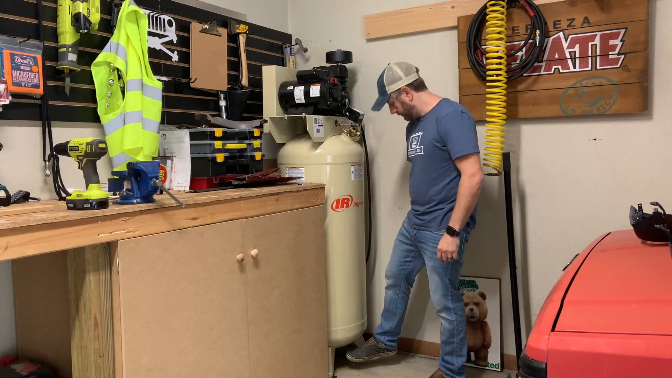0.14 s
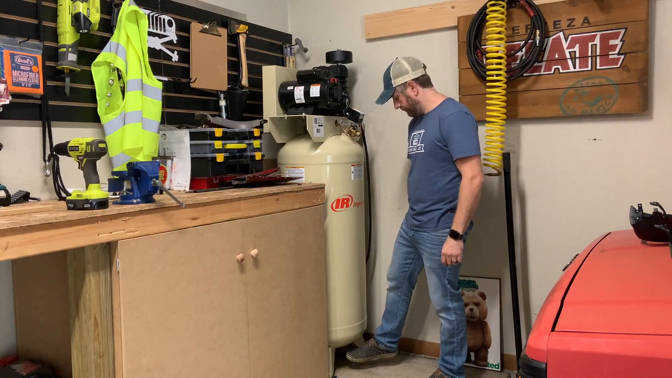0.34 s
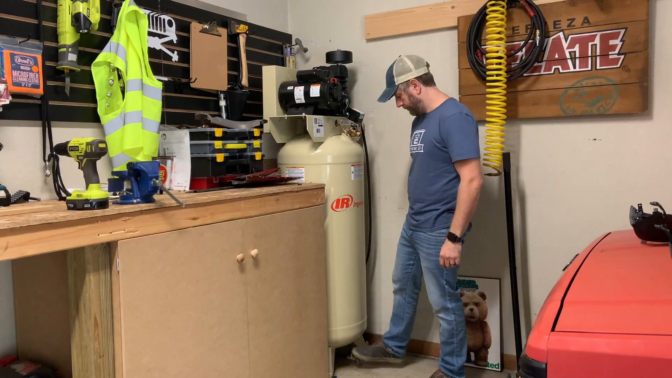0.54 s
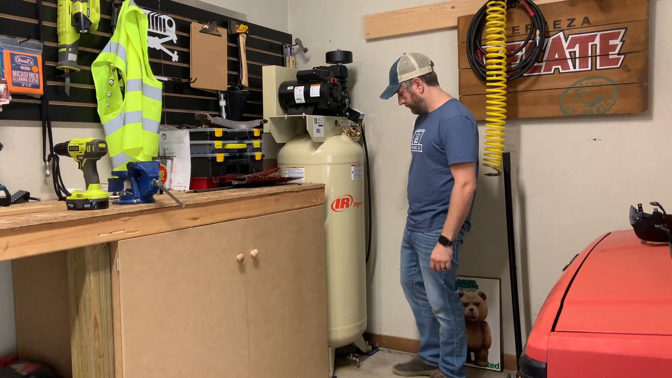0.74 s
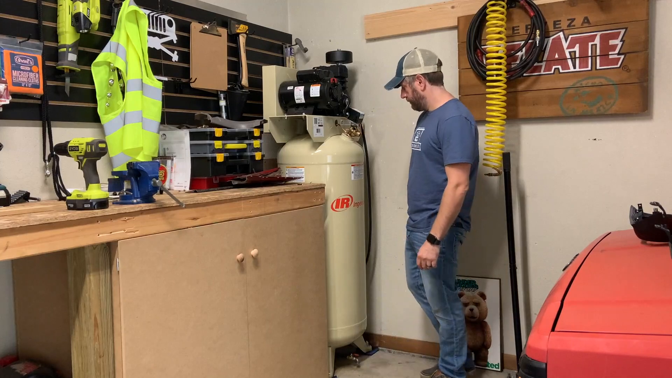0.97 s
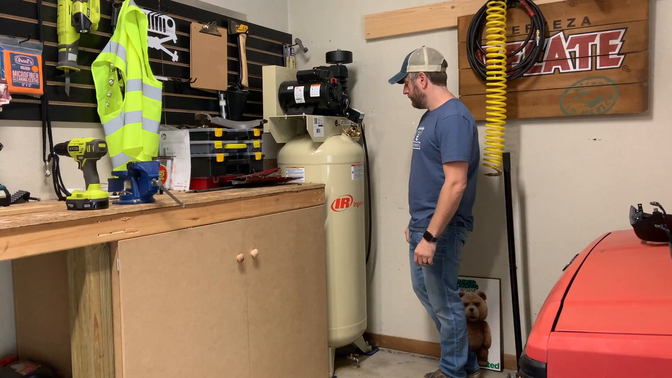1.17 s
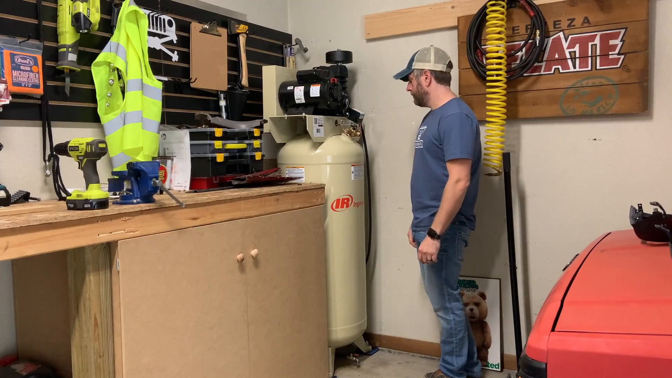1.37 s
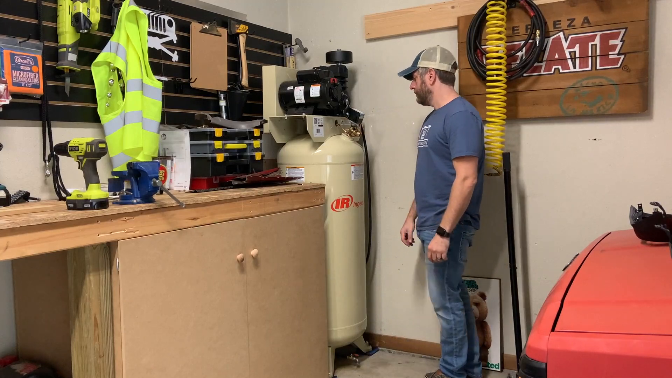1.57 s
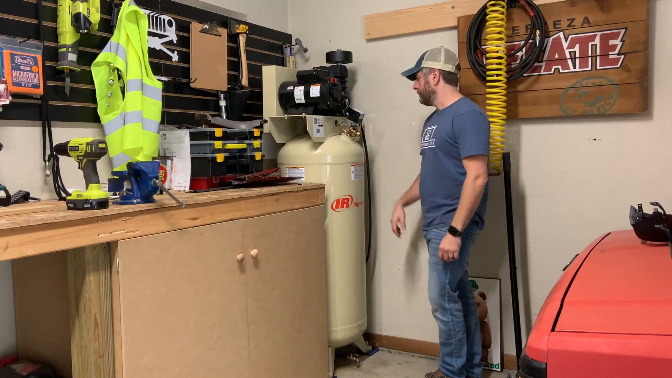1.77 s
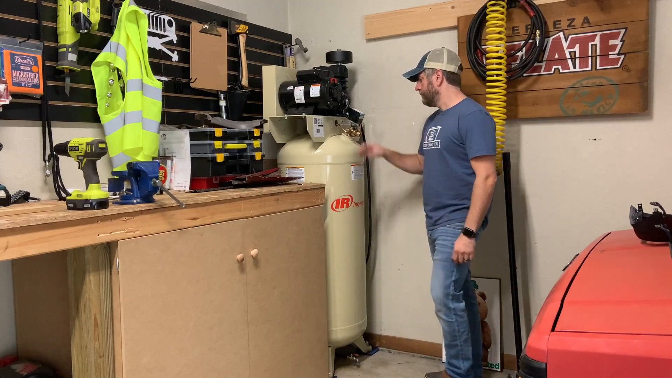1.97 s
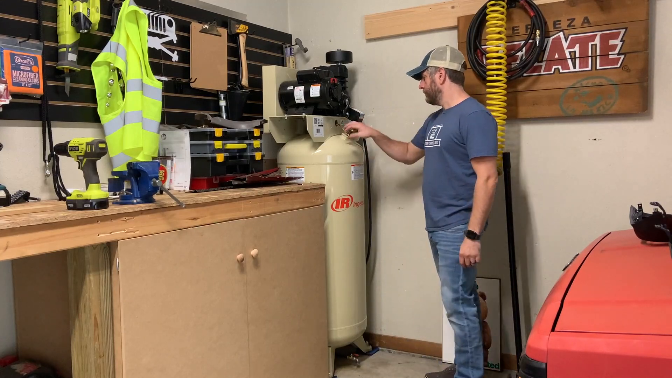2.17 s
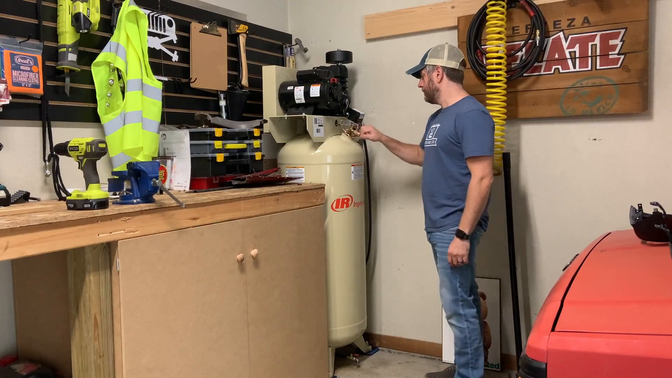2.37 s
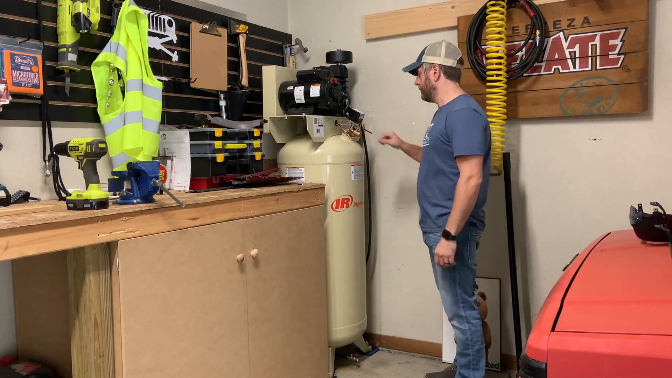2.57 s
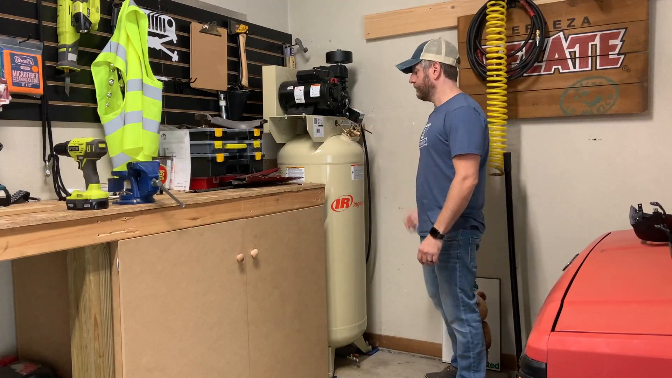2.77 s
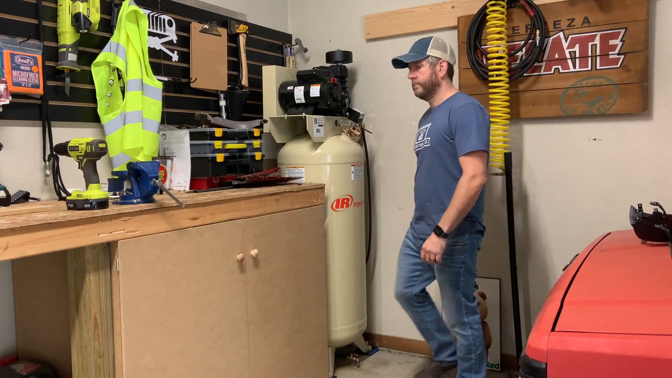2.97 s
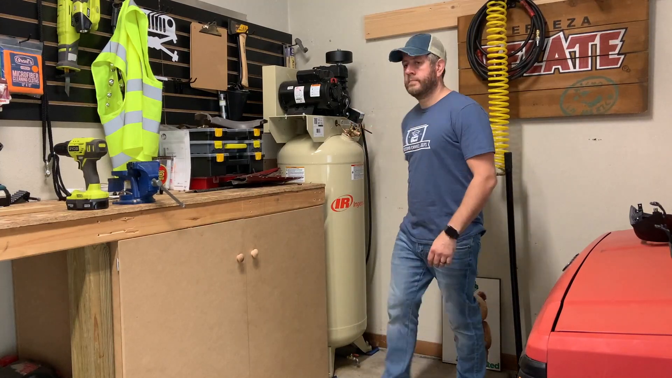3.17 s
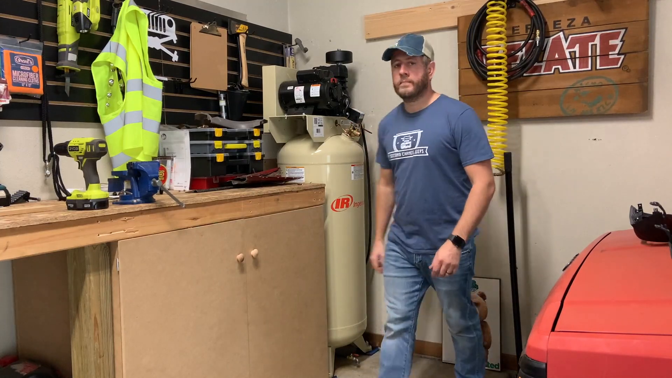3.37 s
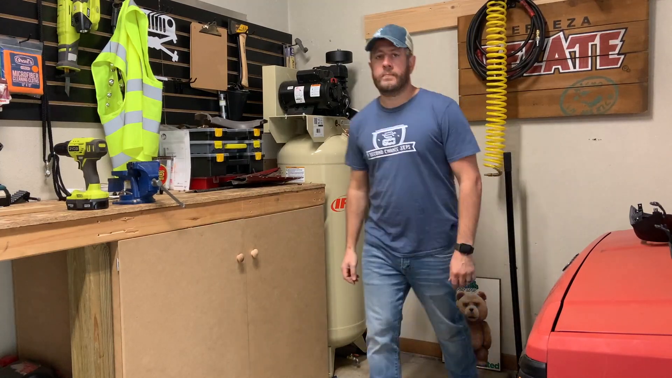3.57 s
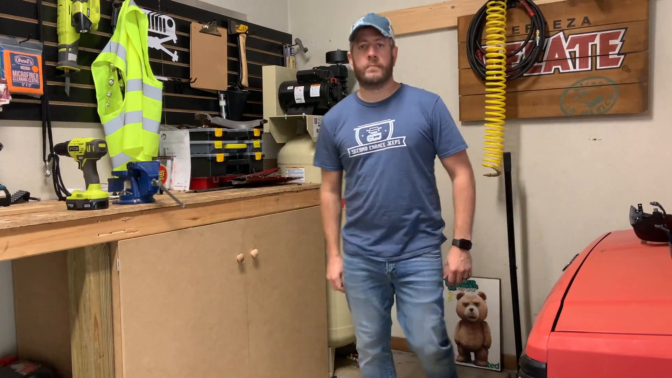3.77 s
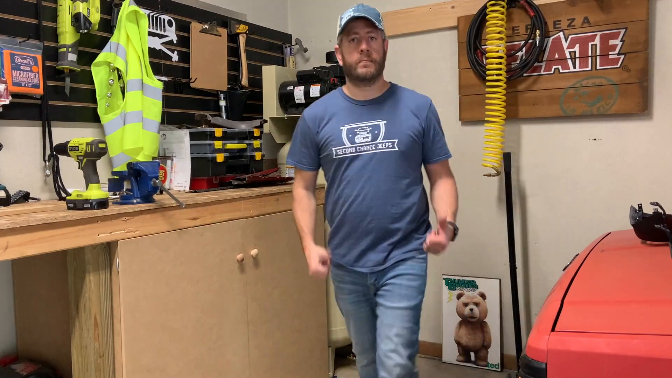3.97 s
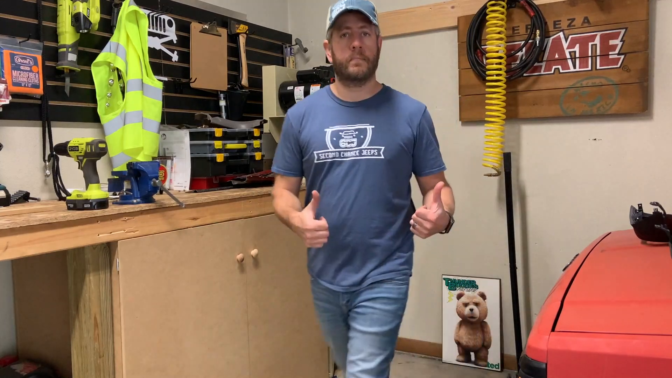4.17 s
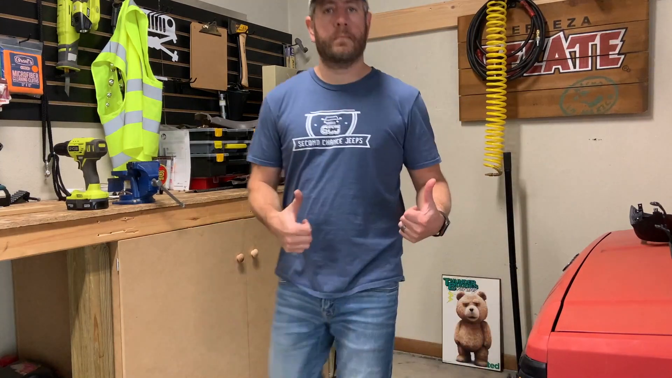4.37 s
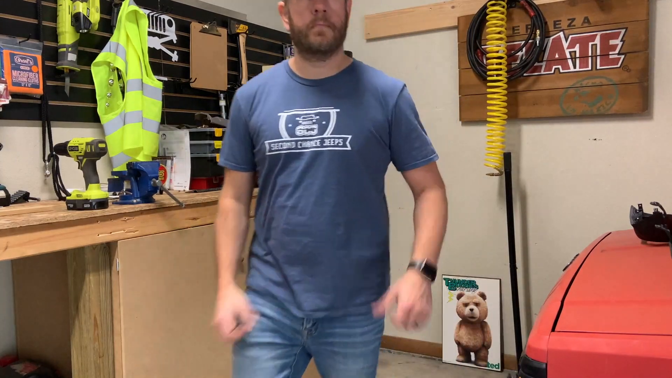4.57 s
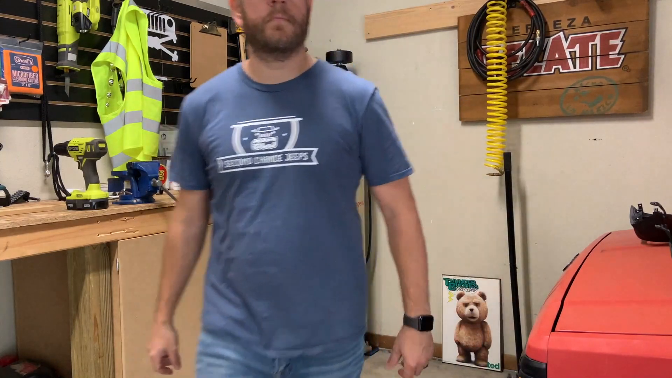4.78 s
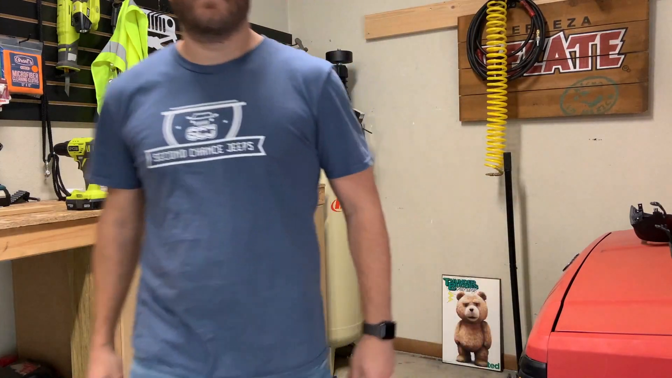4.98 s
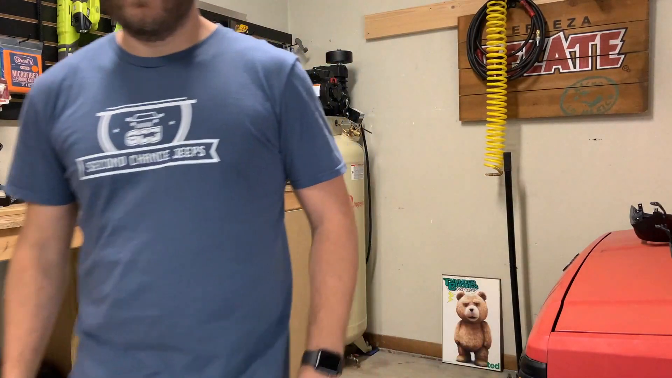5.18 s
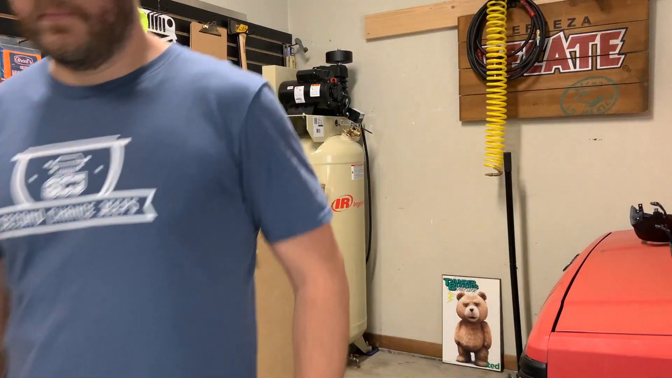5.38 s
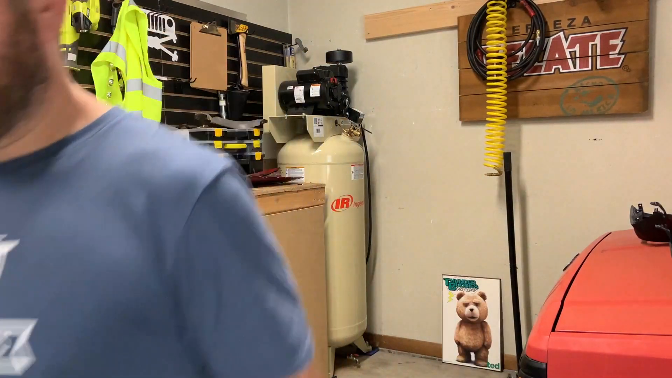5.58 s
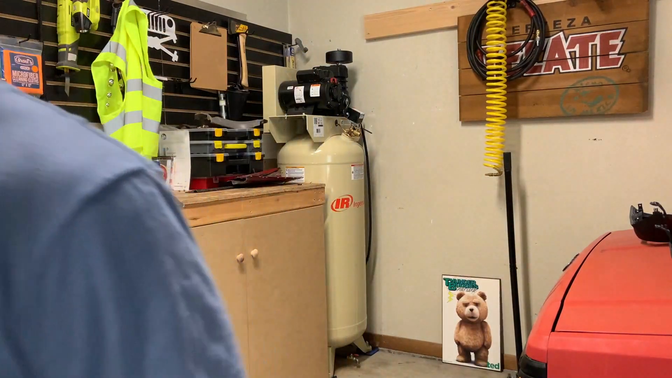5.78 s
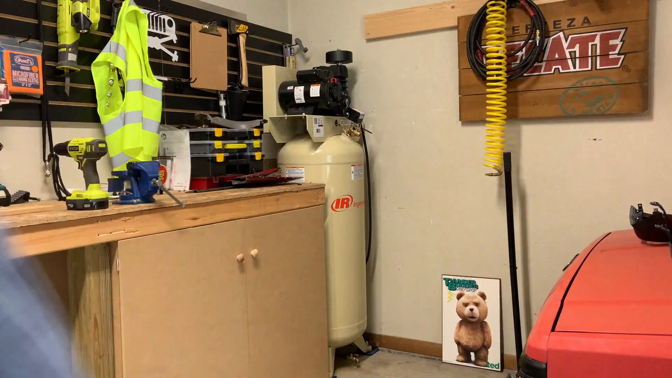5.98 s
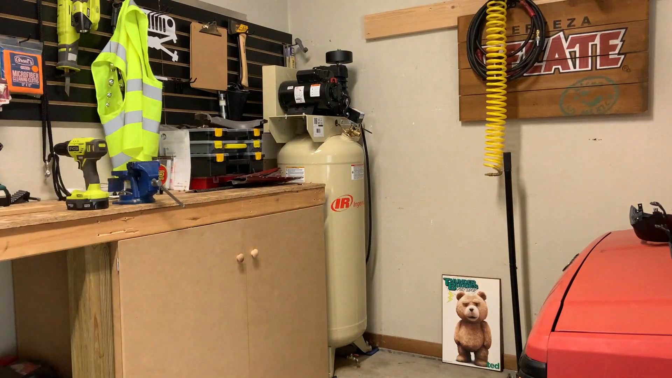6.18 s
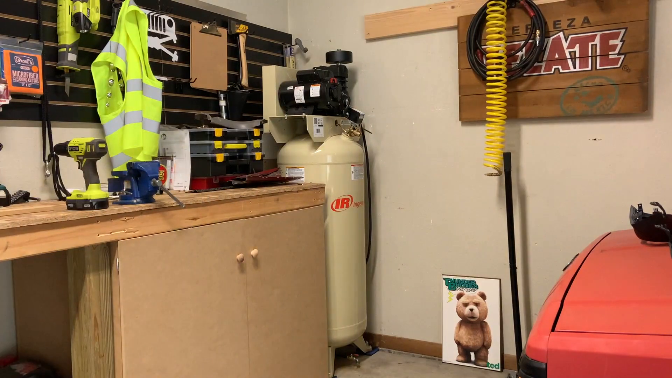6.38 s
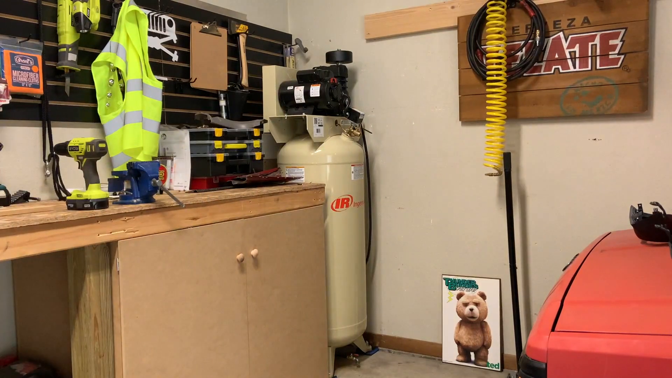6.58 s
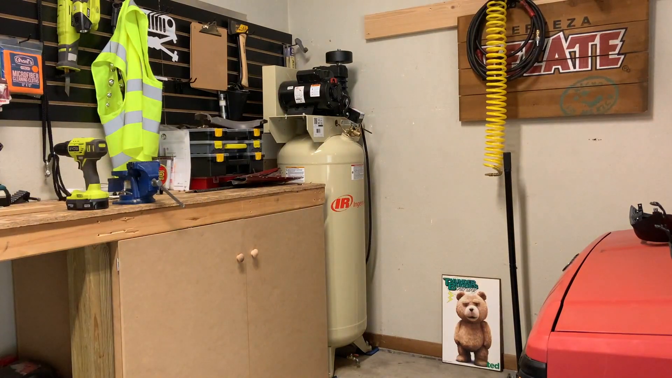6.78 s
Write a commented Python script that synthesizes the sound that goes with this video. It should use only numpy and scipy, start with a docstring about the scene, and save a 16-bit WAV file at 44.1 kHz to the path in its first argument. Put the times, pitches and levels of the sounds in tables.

```python
"""An air compressor tank is drained in a garage, heard through a two-port microphone.
First the barely open valve hisses thinly: shaped noise. Then a slug of water spits out: a bright
burst of noise with short squeals of the drain pipe. Wet air sprays and gushes onto the floor. The free
jet roars on, with a broad whistle that mostly sinks; it grows weaker and duller as the tank empties.
Narrow whistles and broader bands of the hiss swell and sink throughout; near the end come soft
footsteps, each a low thud of noise."""
import sys
import numpy as np
from scipy import signal
from scipy.fft import rfft, irfft
from scipy.io import wavfile
from scipy.ndimage import uniform_filter1d

SR = 44100
rng = np.random.default_rng(int(sys.argv[2]) if len(sys.argv) > 2 else 0)


def wrap_up_sound(samples):
    """Save the sound to the file named by the first command line argument, as 16-bit audio."""
    columns = np.atleast_2d(samples).T
    # keep every value between -1 and 1, then stretch to whole-number steps
    tamed = np.clip(columns, -1, 1)
    steps = np.round(tamed * 32767).astype(np.int16)
    wavfile.write(sys.argv[1], SR, steps)


N = 301643
CLOCK = np.arange(N) / SR  # time of every sample, in s
ALL_HZ = np.fft.rfftfreq(N, 1 / SR)  # frequencies of the whole sound

# short overlapping frames, in samples, for changes that move in time and frequency
FRAME, HOP = 2048, 256
HZ = np.fft.rfftfreq(FRAME, 1 / SR)
TIMES = np.arange(N // HOP + 2) * HOP / SR

# how much of a change in brightness each frequency takes (f/Hz, share 0-1)
BRIGHT_SHARE = [(300, 0.25), (2800, 0.35), (6500, 1), (12000, 1)]
# how alike the two ports hear the throttled flow (f/Hz, likeness 0-1)
THIN_LIKENESS = [(200, .94), (330, .85), (500, .68), (800, .35), (1050, .6), (1700, .3), (2350, .5),
                 (2800, .22), (3800, .55), (5400, .1), (6700, .6), (7900, .82), (8350, .99), (8850, .99),
                 (9600, .75), (11000, .96), (12200, .68), (13100, .98), (14000, .98), (14700, .65)]
# how alike the two ports hear the free flow (f/Hz, likeness 0-1)
FREE_LIKENESS = [(200, .92), (330, .84), (500, .65), (800, .25), (1050, .58), (1700, .17), (4400, .3),
                 (5500, .1), (6800, .47), (7900, .82), (8350, .99), (8850, .99), (9600, .75), (11000, .96),
                 (12200, .68), (13100, .98), (14000, .98), (14700, .65)]

# the valve clears, and the jet carries water until the surge ends
CLEAR_AT_S, CLEAR_RISE_DB_PER_S = 2.425, 270
SURGE_END_S = 2.865


def gain_of(db):
    """Turns decibels into an amplitude factor."""
    return 10 ** (np.asarray(db) / 20)


def read(points, hz):
    """Reads a table over frequency, joined by straight lines on a log axis."""
    f, value = np.transpose(points)
    return np.interp(np.log(hz + 1), np.log(f), value)


def ramp(start_s, length_s):
    """Goes from 0 to 1 in a straight line."""
    return np.clip((CLOCK - start_s) / length_s, 0, 1)


def since(s):
    """Seconds gone by since a moment, zero before it."""
    return np.maximum(CLOCK - s, 0)


def until(s):
    """Seconds left until a moment, zero after it."""
    return np.maximum(s - CLOCK, 0)


def resonance(hz, centre_hz, width_hz):
    """A peak of height 1 that is down to a half at half its width to either side."""
    return 1 / (1 + (2 * (hz - centre_hz) / width_hz) ** 2)


def flutter(times):
    """Random wobble of rms 1, made of sines from 3 to 45 a second, the slow ones strongest."""
    rates_hz = np.geomspace(3, 45, 40)
    wobble = sum(np.sin(2 * np.pi * (f * times + rng.random())) / f ** .25 for f in rates_hz)
    return wobble / wobble.std()


def garage(t60_s, echo_strength, scatter_hz=200):
    """Frequency response of one path through the room: direct sound and a fading cloud of echoes."""
    t = np.arange(SR // 2) / SR
    fade = gain_of(-60 * t / t60_s)
    echoes = rng.standard_normal(len(t)) * fade * (t > .003)
    echoes = echoes / np.linalg.norm(echoes)
    scattered = echo_strength * ALL_HZ / (ALL_HZ + scatter_hz)  # long waves pass the clutter unscattered
    return (1 + scattered * rfft(echoes, N)) / np.sqrt(1 + scattered ** 2)


def turbulence(spectrum, modes, likeness):
    """Steady flow noise with its resonances, as it reaches the two ports through the room."""
    # phase by which the left port leads (f/Hz, phase/rad)
    phase = [(100, 0), (1200, 0), (1800, -.5), (3300, .1), (4800, .6), (6400, -.4), (7200, -.9), (8300, -3),
             (8900, -3.3), (10500, -6.1), (11400, -6.5), (12900, -9.2), (14100, -9.6), (15200, -12.4)]
    # left port's level above the right one's (f/Hz, level/dB)
    balance = [(150, -0.6), (750, 1), (2200, 1), (3600, 0), (5700, -1.9), (6600, -5), (7500, 4), (8500, -6),
               (11000, 3), (15000, -2.5)]
    peaks_db = sum(db * resonance(ALL_HZ, f, width) for f, width, db in modes)
    colour_db = read(spectrum, ALL_HZ) + peaks_db

    a, b = (rfft(rng.standard_normal(N)) * garage(t60_s=.25, echo_strength=.36) for _ in range(2))
    same = np.clip(read(likeness, ALL_HZ), 0, 1)
    shared = a * np.sqrt((1 + same) / 2)
    apart = b * np.sqrt((1 - same) / 2)

    # each port takes half of the difference between them
    lean = gain_of(read(balance, ALL_HZ) / 2) * np.exp(.5j * read(phase, ALL_HZ))
    ports = np.array([(shared + apart) * lean, (shared - apart) / lean])
    return irfft(ports * gain_of(colour_db) * np.sqrt(SR / 2), N)  # from level per Hz to samples


def steer(noise, level_db, tilt_db, shares, flutter_db):
    """The flow sets the level of the noise and tilts it, each frequency by its share."""
    share = np.clip(read(shares, ALL_HZ), 0, 1)
    spectrum = rfft(noise)
    steps = np.linspace(0, 1, 4)
    tilted = 0
    for step in steps:  # split the noise into four overlapping groups of like share
        belongs = np.maximum(1 - abs(share - step) / steps[1], 0)
        tilted = tilted + irfft(spectrum * belongs, N) * gain_of(step * tilt_db)
    wobble = np.interp(CLOCK, TIMES, flutter(TIMES))
    return tilted * gain_of(level_db + flutter_db * wobble)


def change_frames(sound, change_db):
    """Raises or lowers every frequency of every short frame by its own decibels."""
    frames = signal.stft(sound, nperseg=FRAME, noverlap=FRAME - HOP)[2]
    return signal.istft(frames * gain_of(change_db), nperseg=FRAME, noverlap=FRAME - HOP)[1][:, :N]


def lift(noise, humps):
    """Raises moving bell-shaped bands, each (pitch Hz, spread Hz, height dB) frame by frame."""
    lift_db = sum(db * np.exp(-.5 * ((HZ[:, None] - hz) / spread) ** 2) for hz, spread, db in humps)
    return change_frames(noise, lift_db)


def waver(air, patchy_db=2.07, patch_hz=70, patch_s=0.11):
    """Narrow bands of the hiss come and go at random as the jet shifts."""
    patches = rng.standard_normal((len(HZ), len(TIMES)))
    patches = uniform_filter1d(patches, max(1, round(patch_hz / HZ[1])), axis=0)
    patches = uniform_filter1d(patches, max(1, round(patch_s / TIMES[1])), axis=1)
    return change_frames(air, patchy_db * patches / patches.std())


def footfall(s, level_db, thud_hz=115, width_hz=110, rise_db_per_s=900, fall_db_per_s=170):
    """A soft step on the concrete floor: a low band of noise that rises fast and dies away."""
    thud = irfft(rfft(rng.standard_normal(N)) * resonance(ALL_HZ, thud_hz, width_hz), N)
    return thud / thud.std() * gain_of(level_db - rise_db_per_s * until(s) - fall_db_per_s * since(s))


def footsteps():
    """Someone walks by: one thud for each step."""
    # soft steps (t/s, level/dB)
    step_rows = [(5.5, -71), (5.98, -72), (6.5, -72)]
    return sum(footfall(*row) for row in step_rows)


def swelling_band(start, end, start_hz, end_hz, spread_hz, height_db):
    """A narrow whistle or broader band of the air swells, may glide a little and sinks again."""
    progress = np.clip((TIMES - start) / (end - start), 0, 1)
    arch = 2 * np.sqrt(progress * (1 - progress))
    return start_hz + (end_hz - start_hz) * progress, spread_hz, height_db * arch


def add_swelling_bands(air):
    """Passing whistles and broad swells colour the flow noise itself."""
    # whistles and broad swells (start t/s, end t/s, start f/Hz, end f/Hz, spread f/Hz, height level/dB)
    band_rows = [(-.4, .55, 2830, 2830, 130, 2.5), (.3, 2.6, 2375, 2375, 35, 3.5),
                 (2.3, 3.75, 8540, 8540, 110, 2.5), (2.3, 4.5, 10400, 10200, 520, 4),
                 (2.7, 5.4, 6200, 6400, 550, 1.4), (3.15, 3.7, 10420, 10500, 90, 6),
                 (3.75, 5.3, 4200, 4280, 120, 2.5), (4.4, 5.8, 11100, 11300, 200, 1.5),
                 (5.28, 5.9, 4570, 4640, 80, 7.2), (5.3, 6.9, 2420, 2420, 80, 2.4),
                 (5.6, 6.35, 7420, 7400, 75, 7.5), (5.2, 7.6, 2850, 2850, 300, 2.2),
                 (5.5, 7.6, 1370, 1370, 100, 3), (6.1, 7.3, 2720, 2800, 110, 3.2),
                 (5.75, 7.3, 4670, 4640, 55, 4.8), (6.1, 7.2, 5130, 5130, 55, 6.5),
                 (6.35, 7.3, 7400, 7500, 90, 4)]
    return lift(air, [swelling_band(*row) for row in band_rows])


def thin_hiss():
    """Air squeezes past the wet, barely open valve; the hiss thins, dulls slowly and is cut off."""
    # noise colour, before the flow sets it (f/Hz, level per Hz/dB)
    colour = [(40, -103), (80, -99), (160, -98.5), (280, -92), (400, -91), (600, -87.5), (900, -81),
              (2100, -73), (4300, -70), (5700, -72), (7900, -70.5), (8700, -69.5), (9600, -65.5),
              (11200, -70), (13200, -74), (14000, -78), (15600, -77)]
    # resonances of valve and corner (f/Hz, width f/Hz, height level/dB)
    peaks = [(880, 160, 1.5), (1020, 80, 1.5), (1550, 200, 1), (1980, 150, 1.4), (2290, 130, 2.6),
             (2378, 60, 3.2), (2700, 260, 1.8), (3487, 105, 3.8), (3750, 100, 1), (4045, 110, 4.4),
             (4230, 160, 1.9), (4600, 100, 1.8), (6280, 130, 3), (6615, 120, 5), (6790, 70, 3.2),
             (7000, 70, 4.2), (7410, 70, 5), (7495, 90, 6), (7710, 94, 3.5), (8110, 70, 6), (8309, 80, 4.5),
             (8680, 90, 2.5), (8840, 80, 3.5), (9000, 60, 2), (9280, 130, 2.5), (9854, 70, 3.8),
             (10870, 40, 3), (11145, 90, 5), (11480, 50, 3.5), (12180, 50, 3)]
    end_s, fall_db_per_s = 2.34, 487  # the slug arrives
    settled = ramp(0.26, 0.4)  # start and length in s
    level_db = 0.85 - 1.5 * settled - fall_db_per_s * since(end_s)
    bright_db = -1.1 + 3 * settled - 1.05 * CLOCK
    noise = turbulence(colour, peaks, THIN_LIKENESS)
    return steer(noise, level_db, bright_db, BRIGHT_SHARE, flutter_db=0.3)


def squeal(start, end, hz, width_hz, level_db):
    """The drain pipe sings for a moment on one resonance as the slug is pushed through."""
    rise_db_per_s, fall_db_per_s = 1500, 553
    tone = irfft(rfft(rng.standard_normal((2, N))) * resonance(ALL_HZ, hz, width_hz), N)
    tone = tone + tone.mean(0)  # makes the two ports more alike
    return tone / tone.std() * gain_of(level_db - rise_db_per_s * until(start) - fall_db_per_s * since(end))


def squeals():
    """The short squeals around the spit, added up."""
    # squeals of the drain pipe (start t/s, end t/s, f/Hz, width f/Hz, level/dB)
    squeal_rows = [(2.34, 2.354, 3550, 170, -33.5), (2.366, 2.398, 3175, 70, -31)]
    return sum(squeal(*row) for row in squeal_rows)


def spit():
    """The water slug leaves with a short burst that brightens and rings the drain pipe."""
    # noise colour, before the flow sets it (f/Hz, level per Hz/dB)
    colour = [(40, -110), (300, -105), (1400, -83), (2200, -77), (2700, -64.5), (3300, -66), (4300, -64),
              (6000, -59.5), (8500, -63), (11500, -61), (13000, -61), (14200, -74), (15600, -68)]
    # pipe resonances (f/Hz, width f/Hz, height level/dB)
    peaks = [(4590, 110, 4.5), (5300, 200, 2.5), (6770, 130, 3), (7440, 200, 7), (8550, 160, 8),
             (9850, 160, 3), (11100, 150, 3), (11700, 150, 5)]
    start_s, hold_s = 2.355, 0.022
    rise_db_per_s, fall_db_per_s = 496, 330
    level_db = 3.5 - rise_db_per_s * until(start_s) - fall_db_per_s * since(start_s + hold_s)
    bright_db = -4 + 9 * ramp(start_s, 0.097)
    noise = turbulence(colour, peaks, THIN_LIKENESS)
    return steer(noise, level_db, bright_db, BRIGHT_SHARE, flutter_db=0.3)


def gush():
    """Wet air buffets the floor; the splash thins to a deep rumble and fades as the water runs out."""
    # noise colour, before the flow sets it (f/Hz, level per Hz/dB)
    colour = [(25, -97), (45, -89), (78, -77), (120, -81), (230, -77.5), (400, -84), (520, -85.5),
              (800, -74.5), (1500, -100), (4000, -125)]
    # resonances (f/Hz, width f/Hz, height level/dB)
    peaks = [(159, 35, 4.2), (323, 35, 8.9), (507, 110, 11.3)]
    # how much of a change in depth each frequency takes (f/Hz, share 0-1)
    deep_share = [(130, 1), (350, 0.089)]
    start_s, rise_db_per_s, fall_db_per_s = 2.355, 502, 29
    swollen = ramp(2.40, 0.031)
    thinned = ramp(2.49, 0.21)
    released = ramp(SURGE_END_S, 0.042)
    ending_db = -6.5 * released - fall_db_per_s * since(SURGE_END_S)
    level_db = 0.6 - rise_db_per_s * until(start_s) + 5 * swollen - 12.5 * thinned + ending_db
    depth_db = -14.5 + 5 * swollen + 15.5 * thinned
    noise = turbulence(colour, peaks, FREE_LIKENESS)
    return steer(noise, level_db, depth_db, deep_share, flutter_db=1.5)


def surge():
    """While the jet carries water it adds a spraying roar that brightens as it dries."""
    # noise colour, before the flow sets it (f/Hz, level per Hz/dB)
    colour = [(40, -110), (500, -86), (800, -81.5), (1100, -74), (1900, -68.5), (3200, -75), (4400, -69.5),
              (5200, -64.5), (5750, -63), (6300, -67.5), (8500, -70.5), (10000, -73), (12500, -72),
              (15600, -76)]
    # resonances (f/Hz, width f/Hz, height level/dB)
    peaks = [(1360, 120, 3.5), (8540, 200, 5), (11650, 110, 3)]
    fall_db_per_s, brighten_db_per_s = 260, 4.5
    level_db = -0.1 - CLEAR_RISE_DB_PER_S * until(CLEAR_AT_S) - fall_db_per_s * since(SURGE_END_S)
    age_s = np.minimum(since(CLEAR_AT_S), SURGE_END_S - CLEAR_AT_S)
    noise = turbulence(colour, peaks, FREE_LIKENESS)
    return steer(noise, level_db, brighten_db_per_s * age_s, BRIGHT_SHARE, flutter_db=0.96)


def free_jet(whistle_spread_hz=480):
    """The cleared valve roars; as the tank empties the jet dulls and its broad whistle mostly sinks."""
    # noise colour, before the flow sets it (f/Hz, level per Hz/dB)
    colour = [(40, -107.5), (85, -104), (150, -99), (240, -95), (330, -91), (450, -91), (620, -85),
              (1050, -80.5), (2500, -74), (3300, -74), (4000, -73.5), (5600, -75), (6500, -74.5),
              (7200, -73.5), (8000, -76), (9400, -74.5), (10200, -77.5), (11200, -76.5), (12900, -76.5),
              (14000, -82.5), (15600, -80.5)]
    # narrow resonances (f/Hz, width f/Hz, height level/dB)
    peaks = [(1080, 130, 2.2), (1350, 130, 1), (1920, 160, 1.8), (2400, 100, 1.8), (2710, 60, 1.2),
             (3150, 70, 1.8), (3482, 70, 2.6), (4590, 50, 1.5), (5120, 50, 1.2), (5910, 110, 2.8),
             (7005, 50, 2), (7390, 90, 2.8), (7480, 60, 2.5), (7707, 100, 2.8), (8002, 150, 2.8),
             (8260, 90, 2.5), (8546, 130, 3.6), (9050, 150, 2), (9400, 170, 2.5), (9594, 70, 3.5),
             (10120, 60, 2), (10971, 147, 3.6), (11300, 173, 3.3), (11668, 120, 2.8), (12245, 90, 2.5),
             (13200, 300, 2)]
    # the broad whistle (t/s, f/Hz, height level/dB)
    whistle_path = [(2.45, 5500, 3), (3.0, 5150, 8), (3.5, 5020, 6.5), (4.0, 4700, 6.5), (4.5, 4720, 7.5),
                    (5.1, 4830, 8), (5.7, 4750, 5.5), (6.2, 4700, 4.5), (6.8, 4900, 4.2)]
    age_s = since(CLEAR_AT_S)

    # the first excess of pressure dies away, and the level sinks with it
    excess = np.exp(-age_s / 1.22)
    level_db = -1 + 5 * excess - CLEAR_RISE_DB_PER_S * until(CLEAR_AT_S)

    # the jet dulls steadily, and then ever faster
    late_dulling_db = 9.5 * (age_s / 4.44) ** 7.6
    bright_db = 2 - 1.68 * age_s - late_dulling_db
    noise = turbulence(colour, peaks, FREE_LIKENESS)
    roar = steer(noise, level_db, bright_db, BRIGHT_SHARE, flutter_db=0.37)

    s, pitch_hz, height_db = np.transpose(whistle_path)
    broad_whistle = np.interp(TIMES, s, pitch_hz), whistle_spread_hz, np.interp(TIMES, s, height_db)

    # late on, the slow jet gains body in the low middle (pitch Hz, spread Hz, height dB)
    body = 480, 450, 2.8 * np.maximum(TIMES - 5.1, 0)
    return lift(roar, [broad_whistle, body])


def scene():
    """The stages of the draining run into one another; whistles and swells colour it; someone walks by."""
    air = thin_hiss() + spit() + surge() + free_jet()
    air = waver(add_swelling_bands(air))
    return footsteps() + gush() + squeals() + air


def record(dry):
    """The microphone sheds the deepest bass; then a steep filter takes off the highest treble."""
    bass_cut = signal.butter(2, 36, "highpass", fs=SR, output="sos")
    lean = signal.sosfilt(bass_cut, dry)
    treble_cut = signal.firwin(511, 15780, window=("kaiser", 9), fs=SR)  # edge in Hz
    return signal.oaconvolve(lean, treble_cut[None], "same")


dry = scene()
out = record(dry)
wrap_up_sound(out)
```